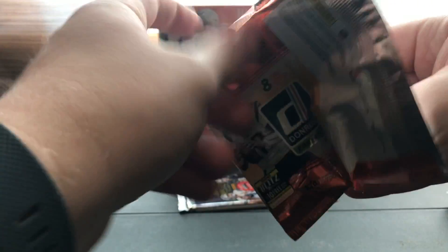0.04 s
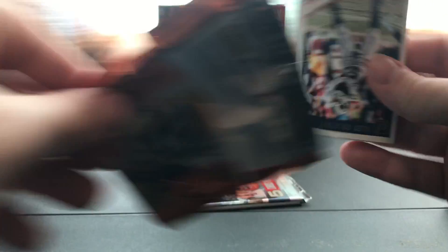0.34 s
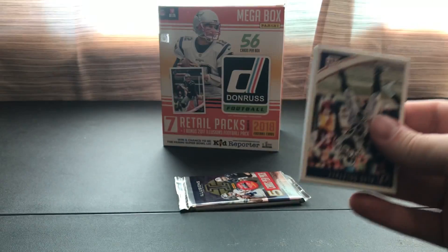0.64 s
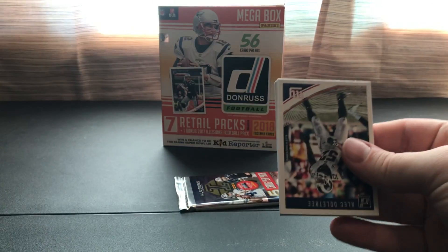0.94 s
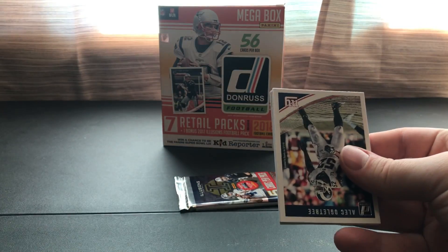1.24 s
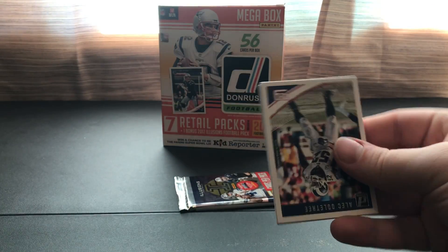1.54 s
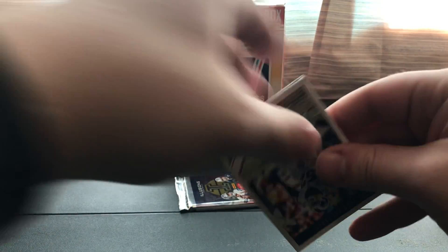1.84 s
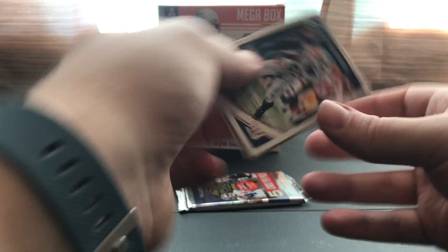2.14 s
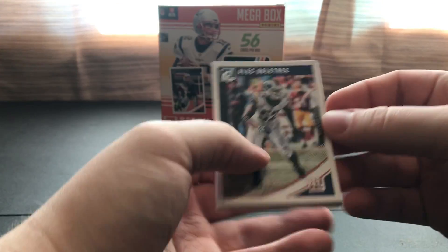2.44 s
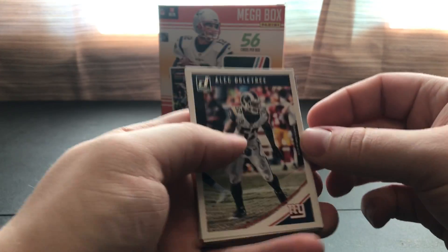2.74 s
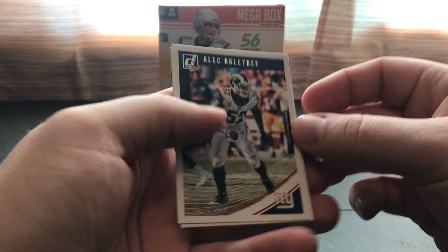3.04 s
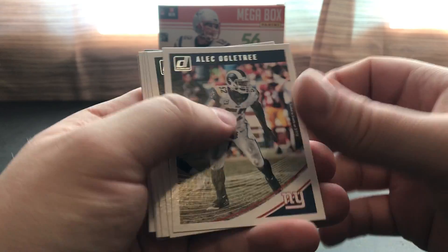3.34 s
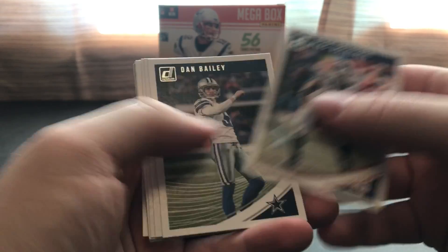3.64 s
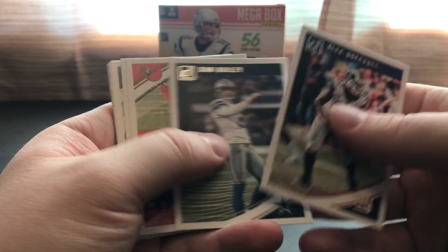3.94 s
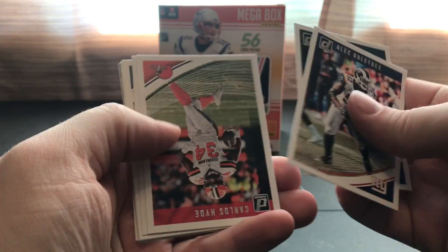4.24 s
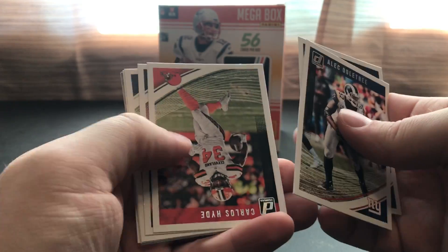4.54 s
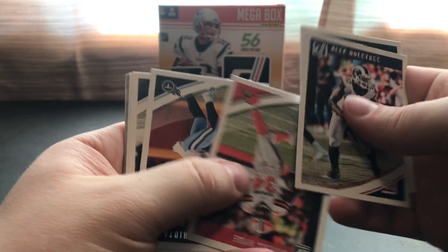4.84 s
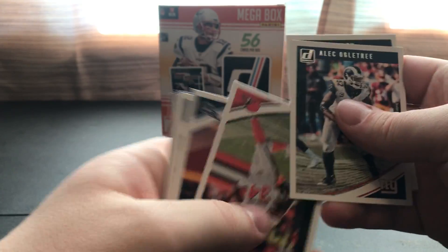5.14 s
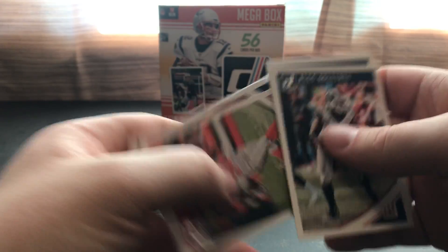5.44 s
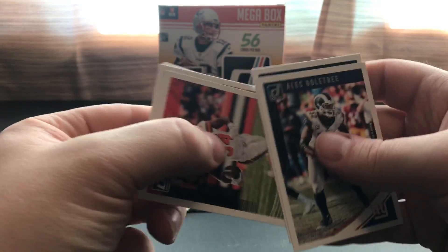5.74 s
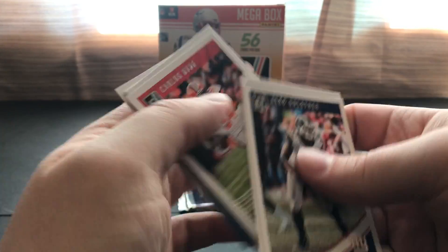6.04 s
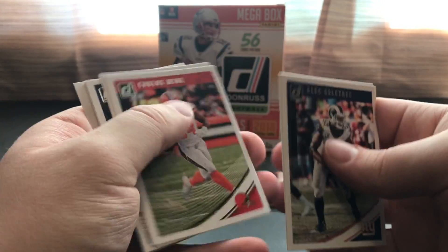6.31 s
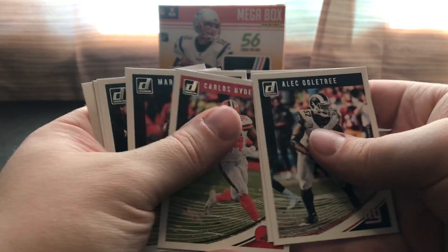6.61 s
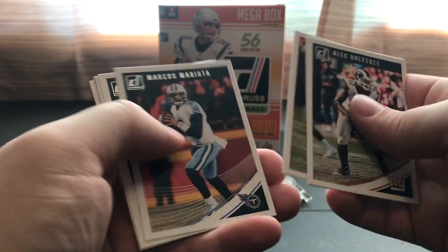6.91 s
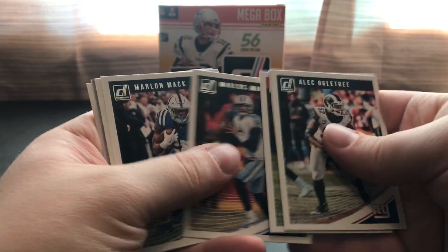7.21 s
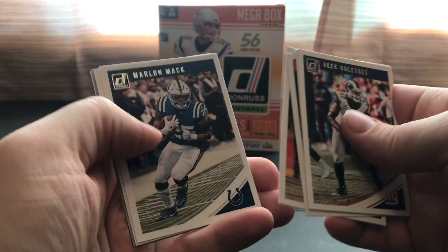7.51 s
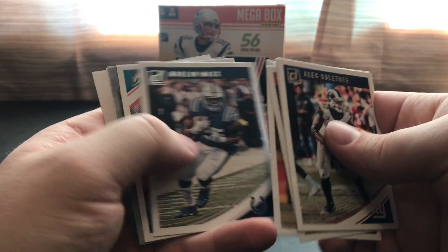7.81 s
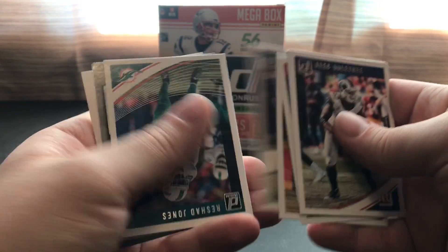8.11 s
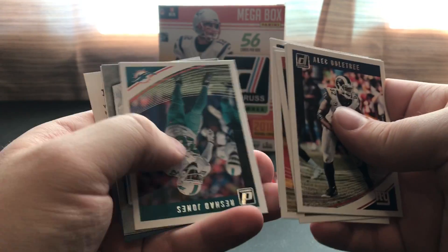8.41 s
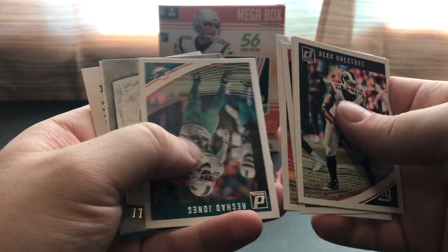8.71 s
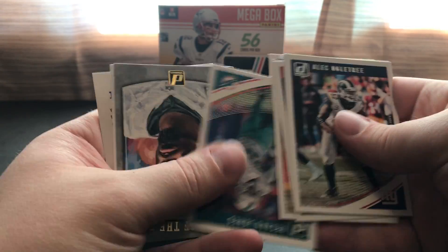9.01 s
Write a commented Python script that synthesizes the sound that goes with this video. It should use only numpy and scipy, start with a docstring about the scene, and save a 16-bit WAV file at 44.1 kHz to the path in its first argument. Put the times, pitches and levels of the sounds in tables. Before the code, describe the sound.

Close, sharp foil crackling, followed by soft papery slides, clicks and taps as cards are thumbed through one by one.

```python
"""A foil wrapper crackles close by as it is crumpled off a pack of trading cards: creases buckle
and the sheet flaps. Tossed aside, it lands and settles. Then a thumb slides the cards one by one
from hand to hand: paper fibres hiss over each other, edges flick free and tap the stack.
Behind it, a quiet small room with a faint low hum."""
import sys
import numpy as np
from scipy import signal
from scipy.fft import rfft, irfft, next_fast_len
from scipy.io import wavfile
from scipy.ndimage import map_coordinates

SR = 44100
rng = np.random.default_rng(int(sys.argv[2]) if len(sys.argv) > 2 else 0)


def generate_wav(signal):
    """Clip the signal to [-1, 1] and save it as 16-bit WAV at the path in sys.argv[1]."""
    frames = np.transpose(np.atleast_2d(signal))
    scaled = np.clip(frames, -1, 1) * 32767
    pcm = np.round(scaled).astype(np.int16)
    wavfile.write(sys.argv[1], SR, pcm)


N = 399574

# card sliding on card: fastest_s, rise_s, fall_s, rub_db, edge_db, hollow_db
CARD_STROKES = [(2.06, .04, .07, -78, -73, -91), (2.385, 0.031, .03, -78, -74, -88),
                (2.61, 0.0066, 0.014, -66, -59, -78), (2.755, 0.027, 0.007, -64, -71, -85.5),
                (3.191, 0.053, 0.086, -66.5, -68, -68.5), (3.362, 0.013, 0.0063, -45, -46, -77),
                (3.51, 0.035, 0.1, -62, -66, -66), (3.711, 0.087, 0.062, -53, -54, -61.5),
                (3.78, 0.055, 0.012, -57, -71, -61), (3.92, 0.13, 0.11, -66.5, -69, -65.5),
                (4.066, 0.069, 0.15, -57.5, -62, -63.5), (4.2, 0.035, 0.038, -51.5, -56, -58),
                (4.255, 0.042, 0.04, -57.5, -56, -69), (4.419, 0.21, 0.072, -73.5, -78, -71.5),
                (4.68, 0.031, .05, -69, -71, -86), (4.745, .03, .05, -65.5, -69, -88),
                (4.922, 0.091, 0.064, -55, -61, -68), (5.26, 0.091, 0.08, -58.5, -62.5, -66.5),
                (5.39, .01, .015, -60, -66, -72), (5.425, 0.014, 0.027, -63.5, -76, -73),
                (5.573, 0.065, 0.043, -51, -47.5, -76), (5.76, 0.14, 0.076, -66.5, -73.5, -74.5),
                (5.92, 0.066, 0.045, -67, -70, -74.5), (6.085, .02, 0.13, -62.5, -62.5, -80.5),
                (6.21, 0.047, .08, -62.5, -67, -65), (6.275, .015, .03, -64, -71, -63),
                (6.33, .04, 0.034, -61.5, -67.5, -70), (6.505, 0.075, 0.017, -63, -65.5, -77),
                (6.69, 0.16, 0.28, -65.5, -74, -73.5), (6.876, 0.033, 0.029, -51.5, -52.5, -74),
                (6.91, 0.032, 0.023, -49, -48.5, -58.5), (7.02, 0.12, 0.39, -70.5, -75, -84),
                (7.305, 0.072, 0.048, -55.5, -59.5, -66), (7.386, 0.029, 0.034, -49, -52.5, -54),
                (7.425, 0.036, 0.021, -66, -52.5, -78), (7.93, 0.082, 0.16, -68, -74, -78),
                (8.03, 0.034, 0.048, -62, -68, -74), (8.07, 0.014, 0.043, -52.5, -56.5, -66),
                (8.165, 0.025, 0.036, -57, -54.5, -62), (8.215, 0.031, 0.02, -67, -53, -71.5),
                (8.4, 0.088, 0.077, -77, -79, -84), (8.89, 0.054, 0.017, -70.5, -77.5, -79),
                (9.04, 0.073, .1, -62, -67, -65.5)]
# card faces rubbing: freq_hz, gain_db
RUB_SPECTRUM = [(700, -14), (1200, -17), (1500, -3), (1850, -9.5), (2400, -7.5), (2850, -4), (3500, 0),
                (4400, -3), (5600, -1), (7500, -5.5), (8500, -6), (10000, -14.5), (13000, -56)]
# card edge hissing: freq_hz, gain_db
EDGE_SPECTRUM = [(3000, -52), (7000, -15), (9000, -2), (10400, -7), (12000, -1), (14000, -6),
                 (16000, -14.5)]
# hollow of the cupped hands: freq_hz, gain_db
HOLLOW_SPECTRUM = [(40, -37), (100, 0), (330, 4.5), (600, 1.5), (950, -0.5), (1200, 0.5), (1500, -13),
                   (2200, -3), (3500, -2.5), (8000, -71)]
# edges flicking and tapping: start_s, level_db, pitch_hz, tick_db, knock_db
CARD_FLICKS = [(2.007, -36.5, 5780, -52, -85), (2.019, -44, 5780, -45, -76.5),
               (2.049, -49.5, 5550, -66, -83), (2.355, -50.5, 5570, -62, -85),
               (2.61, -54, 4400, -63, -75.5), (2.865, -26.5, 3760, -33.5, -52),
               (3.355, -37, 5160, -54, -93), (3.493, -40.5, 5460, -58, -69), (3.581, -43, 2920, -63, -67.5),
               (4.067, -36, 4800, -54, -65.5), (4.202, -34.5, 1560, -53.5, -66),
               (4.912, -56, 5980, -61.5, -68.5), (4.98, -41.5, 1580, -65, -75.5),
               (5.24, -36.5, 5530, -40.5, -83), (5.365, -38.5, 2200, -66, -82),
               (5.387, -40, 3200, -52.5, -76), (5.508, -39, 5500, -46, -71.5), (5.914, -38, 5530, -40, -71),
               (6.213, -37, 3870, -55, -82), (6.268, -40.5, 1500, -47, -69.5),
               (6.686, -29.5, 2550, -51, -60.5), (6.905, -36.5, 3440, -51.5, -64),
               (7.307, -26.5, 4770, -34.5, -65), (7.311, -30.5, 5030, -37, -55.5),
               (8.005, -42, 1780, -62, -78), (8.059, -35, 1480, -54.5, -60), (8.067, -40, 3480, -41, -71),
               (8.33, -44, 2930, -64, -78), (8.715, -61, 2970, -71, -80.5), (8.919, -59, 2870, -73, -77),
               (8.755, -53.5, 6830, -69, -77.5), (9.032, -35, 3020, -41, -59),
               (9.055, -45, 3030, -61, -63.5)]
# stack held in the palm: mode_hz, gain_db, t60_s
STACK_MODES = [(130, -20.5, 0.066), (200, -0.5, 0.033), (276, -1, 0.044), (357, -2.5, 0.067),
               (603, 4, 0.019), (920, 2.5, 0.016)]
# a corner or the thumb dragging: centre_s, half_length_s, pitch_hz, level_db
CARD_SCRAPES = [(2.068, 0.053, 6600, -71.5), (2.384, .042, 6830, -74.5), (2.547, 0.025, 6200, -72),
                (3.407, 0.033, 7520, -67.5), (3.576, 0.024, 1240, -65.5), (3.79, 0.011, 2500, -61),
                (4.468, .02, 3060, -71), (5.115, .02, 315, -69), (5.122, 0.027, 2090, -70),
                (5.315, 0.025, 2940, -66.5), (5.372, 0.013, 2600, -58), (5.58, 0.066, 5500, -50.5),
                (5.735, 0.1, 1990, -75), (6.189, .029, 3340, -59), (6.276, 0.029, 1370, -65),
                (6.675, .031, 1650, -65.5), (7.377, 0.032, 1970, -65), (7.443, 0.033, 3290, -64),
                (7.504, 0.031, 3420, -73), (7.642, 0.05, 3200, -84), (8.16, 0.027, 1640, -63),
                (8.232, 0.026, 3260, -59), (8.355, 0.019, 3900, -67.5), (8.514, 0.23, 2994, -80.5)]
# one card chattering as it turns: time_s, pitch_hz, level_db
SQUEAK_CURVE = [(5.51, 490, -76), (5.535, 540, -66), (5.552, 600, -61), (5.57, 650, -58), (5.59, 615, -61),
                (5.61, 595, -69), (5.635, 570, -88)]
# fingers bumping the stack: start_s, level_db
FINGER_BUMPS = [(2.362, -49), (2.61, -52), (3.844, -44.5), (4.916, -49), (4.984, -48), (5.39, -50.5),
                (5.922, -41.5), (6.691, -50), (6.909, -46), (7.31, -51), (8.131, -49), (8.332, -45)]
# foil creases buckling: start_s, level_db, pitch_hz, tick_db
FOIL_SNAPS = [(0.018, -21.5, 4290, -31.5), (0.029, -23.5, 3400, -27), (0.038, -18, 3920, -15),
              (0.068, -10, 2840, -17.5), (0.103, -20.5, 6100, -24.5), (0.129, -26, 3720, -31),
              (0.142, -29, 2450, -37), (0.178, -7.5, 5140, -7), (0.21, -32, 3400, -34),
              (0.218, -26, 2080, -43), (0.223, -24.5, 3440, -19), (0.226, -25, 2440, -32),
              (0.26, -25, 5700, -25), (0.267, -22.5, 5730, -25.5), (0.377, -30, 3750, -43),
              (0.391, -31, 1980, -61), (0.469, -31, 4300, -27.5), (0.486, -35.5, 4200, -46),
              (0.811, -29, 1940, -32.5), (0.865, -29.5, 1200, -44), (0.886, -26.5, 4830, -30),
              (0.898, -26, 3930, -38), (0.966, -38, 1250, -54), (1.044, -37, 5500, -44),
              (1.08, -31, 1900, -38), (1.085, -27, 1840, -45), (1.096, -30.5, 1200, -49),
              (1.174, -48, 2350, -45), (1.243, -44.5, 1820, -59), (1.515, -31, 2590, -33.5),
              (1.664, -36, 2790, -47), (1.694, -50, 905, -70)]
# wrapper squeezed, swung away, skidding, settling: start_s, hold_s, crackle_db, flutter_db
FOIL_RUSTLES = [(0.002, 0.12, -44.5, -53.5), (0.124, .06, -56, -51.5), (0.219, 0.0045, -36, -44),
                (0.268, 0.019, -40.5, -52), (0.302, 0.043, -45.5, -52), (0.389, 0.01, -76, -52),
                (0.411, 0.272, -66.5, -66), (0.807, 0.061, -51, -64.5), (0.889, 0.019, -44.5, -55.5),
                (0.942, 0.072, -53, -68), (1.059, 0.044, -49.5, -58.5), (1.137, 0.026, -62.5, -66),
                (1.307, 0.051, -67.5, -78), (1.428, 0.14, -69, -91), (1.515, .012, -53, -59)]
# foil crackle in the hand: freq_hz, gain_db
HELD_FOIL_SPECTRUM = [(290, -40.5), (500, -18.5), (659, -5), (1140, -17), (1460, -3), (2230, -2),
                      (2460, -2), (4870, -4), (5390, -2.5), (7750, -7), (14700, -9), (16000, -16)]
# foil crackle after the toss: freq_hz, gain_db
TOSSED_FOIL_SPECTRUM = [(260, -35.5), (450, -26), (800, 2), (1150, 7.5), (1800, 2.5), (3400, 2.5),
                        (5200, 0), (6900, -5), (8600, 2.5), (11000, -6), (13000, -3.5), (16000, -15)]
# whole sheet flapping: freq_hz, gain_db
FLUTTER_SPECTRUM = [(30, -11), (70, -1), (150, 0.5), (320, -0.5), (470, -11.5), (700, -9.5), (1400, -14.5),
                    (4000, -71.5)]
# wall reverberation: freq_hz, t60_s
WALL_DECAY = [(150, 0.28), (1000, 0.95), (4000, 0.66), (14000, .4)]
# steady room noise: freq_hz, gain_db
AIR_SPECTRUM = [(15, -51.5), (25, -12), (55, -0.5), (92, -0.5), (123, -4.5), (301, -7.5), (335, -5),
                (427, -12), (575, -12), (1020, -15), (2480, -19.5), (4370, -19), (5430, -21.5),
                (14000, -22.5), (16000, -23.5)]
# swells of the low hum: start_s, hold_s, level_db
LOW_HUM_SWELLS = [(0.044, 0.25, -62), (1.067, 0.03, -67.5), (1.35, 0.074, -71), (2.37, 0.056, -62.5),
                  (2.613, .04, -65), (5.717, 0.16, -67), (6.055, 0.04, -66), (7.023, 0.048, -67),
                  (7.33, .08, -69), (8.129, 0.031, -67.5)]


def card_slides(ring_hz=2978, ring_db=-77.5):
    """Under uneven thumb pressure faces rub, the edge hisses, the card rings, cupped hands resonate."""
    shapes = [swell(fastest_s, rise_s, fall_s, roundness=1.13)
              for fastest_s, rise_s, fall_s, *_ in CARD_STROKES]
    rub_gain, edge_gain, hollow_gain = (envelope(shapes, db) for db in np.transpose(CARD_STROKES)[3:])
    pressure = amp(2.4 * wobble(70))
    on_face, on_edge = paper_friction(), paper_friction()
    rub = rub_gain * coloured(on_face, RUB_SPECTRUM)
    edge = edge_gain * coloured(on_edge, EDGE_SPECTRUM)
    hollow = hollow_gain * coloured(on_edge, HOLLOW_SPECTRUM)
    ring = amp(ring_db) * np.sqrt(unit(rub_gain)) * narrow_noise(ring_hz, q=6)
    return pressure * (rub + edge + hollow + ring)


def paper_friction():
    """Fibres catch and slip by the thousand; now and then the cut edge snags."""
    fibres = grains(rate_hz=5000, spread_db=5) + 0.9 * rng.standard_normal(N)
    snags = 0.42 * grains(rate_hz=130, spread_db=3)
    return moving_contact(fibres + snags, depth_db=1.98)


def card_flicks(t60_s=0.014):
    """An edge snaps free, sharply if bent far; the card then slaps the stack with a dead knock."""
    out, t = np.zeros(N), np.arange(SR // 8) / SR
    for start_s, level_db, pitch_hz, tick_db, knock_db in CARD_FLICKS:
        release = 9 * amp(level_db + 20.5)
        flick = crack(level_db, pitch_hz, tick_db, t60_s, release, q=7.9, broad_gain=0.37, broad_hz=2680)
        add(out, start_s, flick)
        knock = np.zeros(len(t))
        for mode_hz, gain_db, mode_t60_s in STACK_MODES:
            decay = amp(gain_db + rng.normal(0, 3.1) - 60 * t / mode_t60_s)
            detuned_hz = mode_hz * (1 + 0.054 * rng.normal())
            knock += decay * np.sin(2 * np.pi * detuned_hz * t)
        add(out, start_s + 0.00081, amp(knock_db) * unit(knock))
    return out


def card_scrapes(q=3.6):
    """Short swells of coarse friction excite one bending mode of a card."""
    out = np.zeros(N)
    for centre_s, half_length_s, pitch_hz, level_db in CARD_SCRAPES:
        window = np.hanning(round(2 * half_length_s * SR))
        slips = rng.laplace(size=len(window)) * window
        scrape = filtered(slips, lambda f: resonance(f, pitch_hz, q) * resonance(f, pitch_hz, q=0.16))
        add(out, centre_s - half_length_s, amp(level_db) * unit(scrape))
    return out


def card_squeak(fade_s=0.01):
    """Stick and slip lock into a brief tone that rises and falls with card speed."""
    t = np.arange(N) / SR
    time_s, pitch_hz, level_db = np.transpose(SQUEAK_CURVE)
    jittered_hz = np.interp(t, time_s, pitch_hz) * (1 + 0.02 * wobble(200))
    inside_s = np.minimum(t - time_s[0], time_s[-1] - t)
    gate = np.clip(1 + inside_s / fade_s, 0, 1)
    return gate * amp(np.interp(t, time_s, level_db)) * np.sqrt(2) * sine(jittered_hz)


def finger_bumps(pitch_hz=90, attack_s=0.0013, t60_s=0.037):
    """Fingertips press the stack: a low, soft push."""
    out, t = np.zeros(N), np.arange(SR // 4) / SR
    bump = (1 - np.exp(-t / attack_s)) * amp(-60 * t / t60_s) * np.sin(2 * np.pi * pitch_hz * t)
    for start_s, level_db in FINGER_BUMPS:
        add(out, start_s, amp(level_db) * bump)
    return out


def foil_snaps(max_t60_s=0.011):
    """Creases pop through; the harder the pop, the shorter and cleaner it is."""
    out = np.zeros(N)
    for start_s, level_db, pitch_hz, tick_db in FOIL_SNAPS:
        force = amp(0.5 * (level_db + 21))
        snap = crack(level_db, pitch_hz, tick_db, t60_s=max_t60_s / max(force, 1),
                     release=0.8 * force, q=8.6, broad_gain=0.19, broad_hz=3256)
        add(out, start_s, snap)
    return out


def foil_rustle(rustles, spectrum, crease_rate_hz, rise_s=0.0027, fall_s=0.019):
    """Tiny creases crackle in clumps while the whole sheet flaps."""
    shapes = [swell(start_s, rise_s, fall_s, hold_s) for start_s, hold_s, *_ in rustles]
    crackle_db, flutter_db = np.transpose(rustles)[2:]
    clumps = amp(3 * wobble(110))
    creases = clumps * (grains(crease_rate_hz, spread_db=5) + 0.6 * rng.standard_normal(N))
    crackle = coloured(moving_contact(creases, depth_db=4), spectrum)
    flutter = coloured(grains(rate_hz=700, spread_db=2), FLUTTER_SPECTRUM)
    return envelope(shapes, crackle_db) * crackle + envelope(shapes, flutter_db) * flutter


def crack(level_db, pitch_hz, tick_db, t60_s, release, q, broad_gain, broad_hz):
    """One bending mode of a sheet over its broad response, plus a short treble tick."""
    def sheet(f):
        modes = resonance(f, pitch_hz, q) + broad_gain * resonance(f, broad_hz, q=0.39)
        return modes / (1 + (f / 8000) ** 4)

    body = slip_burst(t60_s, release, sheet)
    tick = slip_burst(0.92 * t60_s, release / 2, lambda f: resonance(f, centre_hz=9000, q=0.87) ** 2)
    return amp(level_db) * body + amp(tick_db) * tick


def slip_burst(t60_s, release, response):
    """A sudden release and a dying run of slips, through a frequency response."""
    t = np.arange(SR // 8) / SR
    decay = amp(-60 * t / max(t60_s, 0.002))
    slips = decay * rng.choice([-1, 1], len(t))
    slips[0] = 1 + release
    rms = np.sqrt(np.mean(decay ** 2)) / 2
    return rms * unit(filtered(np.pad(slips, (8, 0)), response))


def moving_contact(x, depth_db):
    """Narrow resonances come and go as the fingers move the point of contact."""
    bins = signal.stft(x, nperseg=512)[2]
    smoothing = np.outer(np.hanning(9), np.hanning(15))
    ripple = signal.fftconvolve(rng.standard_normal(bins.shape), smoothing, "same")
    return signal.istft(bins * amp(depth_db * unit(ripple)), nperseg=512)[1][:N]


def room_echoes(x, near_db, near_t60_s, walls_db, near_cutoff_hz=7000, delay_s=0.002):
    """Desk and box reflect at once; the walls leave a faint longer tail."""
    freq_hz, t, bins = signal.stft(rng.standard_normal(SR), SR, nperseg=256)
    wall_decay = amp(-60 * t / log_interp(WALL_DECAY, freq_hz)[:, None])
    walls = signal.istft(bins * wall_decay, SR, nperseg=256)[1][:SR]
    near = rng.standard_normal(SR) * amp(-60 * np.arange(SR) / SR / near_t60_s)
    near = filtered(near, lambda f: 1 / (1 + 1j * f / near_cutoff_hz))
    tail = amp(near_db) * near / np.linalg.norm(near) + amp(walls_db) * walls / np.linalg.norm(walls)
    return signal.fftconvolve(x, np.pad(tail, (round(delay_s * SR), 0)))[:N]


def background(hum_hz=64.7, hum_db=-80, air_db=-71, rise_s=0.03, fall_s=0.098):
    """Steady hiss and a low hum that wavers and swells."""
    hum = amp(hum_db) * narrow_noise(hum_hz, q=2.7)
    shapes = [swell(start_s, rise_s, fall_s, hold_s) for start_s, hold_s, _ in LOW_HUM_SWELLS]
    swells = envelope(shapes, np.transpose(LOW_HUM_SWELLS)[2])
    tone = unit(sine(hum_hz * (1 + 0.093 * wobble(37))))
    air = amp(air_db) * coloured(rng.standard_normal(N), AIR_SPECTRUM)
    return air + hum + swells * tone


def amp(db):
    return 10 ** (np.asarray(db) / 20)


def unit(x):
    """Scale to rms 1."""
    return x / np.sqrt(np.mean(x ** 2) + 1e-20)


def sine(pitch_hz):
    return np.sin(2 * np.pi * np.cumsum(pitch_hz) / SR)


def log_interp(points, freq_hz):
    points_hz, values = np.transpose(points)
    return np.interp(np.log(freq_hz + 1), np.log(points_hz + 1), values)


def wobble(rate_hz):
    """Smooth random curve."""
    knots = rng.standard_normal(int(N * rate_hz / SR) + 4)
    return map_coordinates(knots, [np.arange(N) * rate_hz / SR], order=2)


def filtered(x, response):
    size = next_fast_len(len(x) + 4096)
    return irfft(rfft(x, size) * response(np.fft.rfftfreq(size, 1 / SR)), size)[:len(x)]


def coloured(x, spectrum):
    """Shape x by a spectrum; rms 1."""
    return unit(filtered(x, lambda f: amp(log_interp(spectrum, f))))


def resonance(f, centre_hz, q):
    damping = 1j * f * centre_hz / q
    return damping / (centre_hz ** 2 - f ** 2 + damping)


def narrow_noise(centre_hz, q):
    return unit(filtered(rng.standard_normal(N), lambda f: resonance(f, centre_hz, q) ** 2))


def grains(rate_hz, spread_db):
    """Randomly timed impulses of uneven size; rms 1."""
    size = amp(spread_db * np.clip(rng.standard_normal(N), -2, 2))
    fires = rng.random(N) < rate_hz / SR
    return unit(fires * size * rng.choice([-1, 1], N))


def swell(peak_s, rise_s, fall_s, hold_s=0, roundness=1):
    """Gain every 32 samples, 10 dB down at rise_s and fall_s; roundness 1 is pointed, 2 a bell."""
    t = np.arange(0, N, 32) / SR - peak_s
    before = np.maximum(-t, 0) / max(rise_s, 0.002)
    after = np.maximum(t - hold_s, 0) / max(fall_s, 0.002)
    return amp(-10 * (before + after) ** roundness)


def envelope(shapes, levels_db):
    """Sum swells in power; one gain per sample."""
    power = sum((amp(db) * shape) ** 2 for shape, db in zip(shapes, levels_db))
    return np.interp(np.arange(N), np.arange(0, N, 32), np.sqrt(power))


def add(track, start_s, sound):
    part = track[max(round(start_s * SR), 0):][:len(sound)]
    part += sound[:len(part)]


def scene(toss_s=0.46):
    """Wrapper, then cards; the tossed wrapper lies further off, so more of it arrives as echo."""
    held = [row for row in FOIL_RUSTLES if row[0] < toss_s]
    tossed = [row for row in FOIL_RUSTLES if row[0] >= toss_s]
    foil = foil_snaps() + foil_rustle(held, HELD_FOIL_SPECTRUM, crease_rate_hz=1900)
    foil += foil_rustle(tossed, TOSSED_FOIL_SPECTRUM, crease_rate_hz=2300)
    cards = card_flicks() + card_slides() + card_scrapes() + card_squeak() + finger_bumps()
    away = np.arange(N) / SR > toss_s
    close, distant = foil * ~away + cards, foil * away
    echoes = room_echoes(close, near_db=-18.5, near_t60_s=0.12, walls_db=-23.5)
    echoes += room_echoes(distant, near_db=-11.5, near_t60_s=0.057, walls_db=-17)
    return close + distant + echoes + background()


def record(dry, low_hz=42, top_hz=16000):
    """A small microphone drops the deepest bass; a steep band limit cuts the top."""
    def response(f):
        low_cut = -f * f / (low_hz ** 2 - f * f + 1j * f * low_hz)
        return low_cut / np.sqrt(1 + (f / top_hz) ** 160)

    return filtered(dry, response)


dry = scene()
out = record(dry)
generate_wav(out)
```